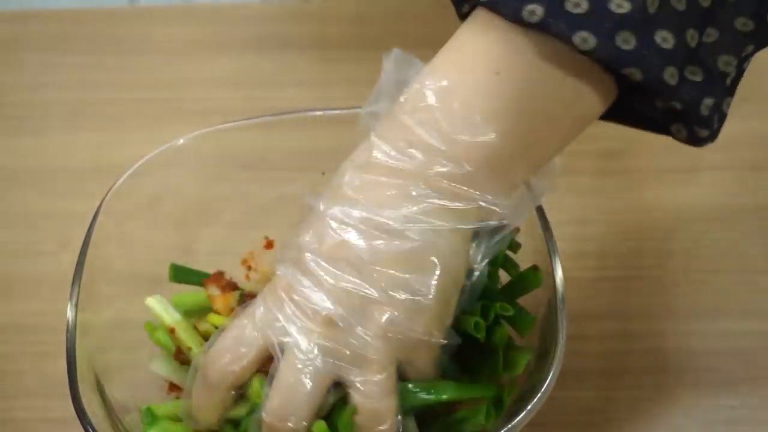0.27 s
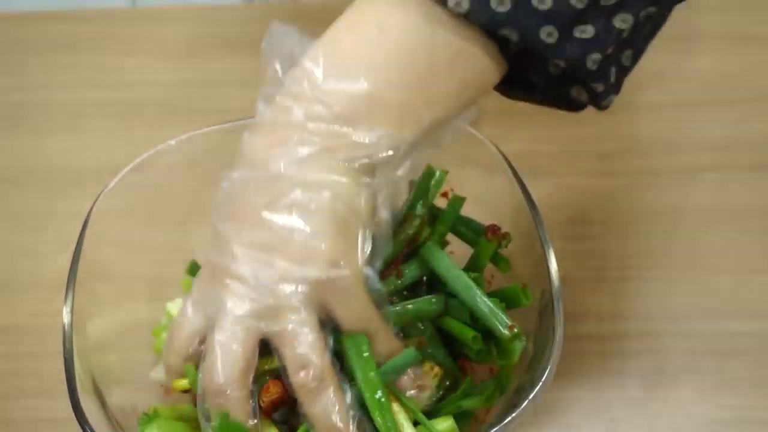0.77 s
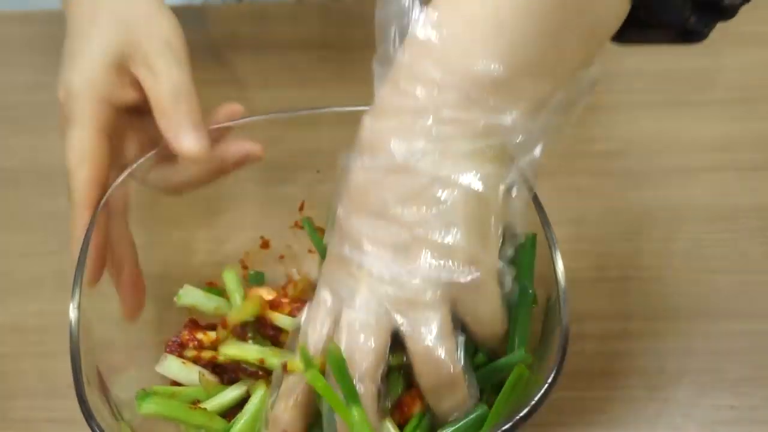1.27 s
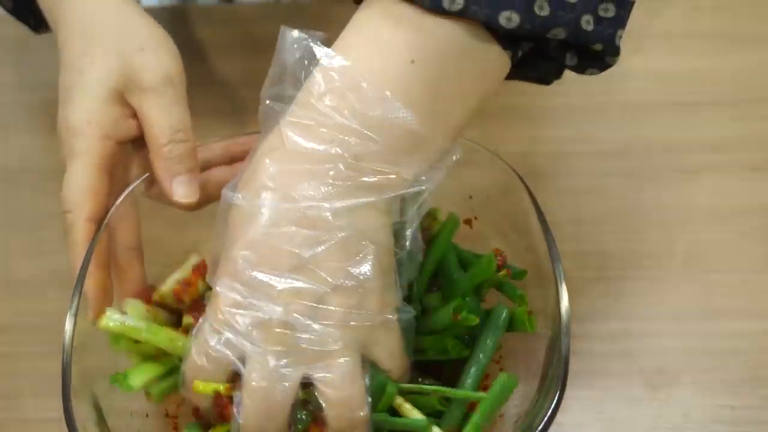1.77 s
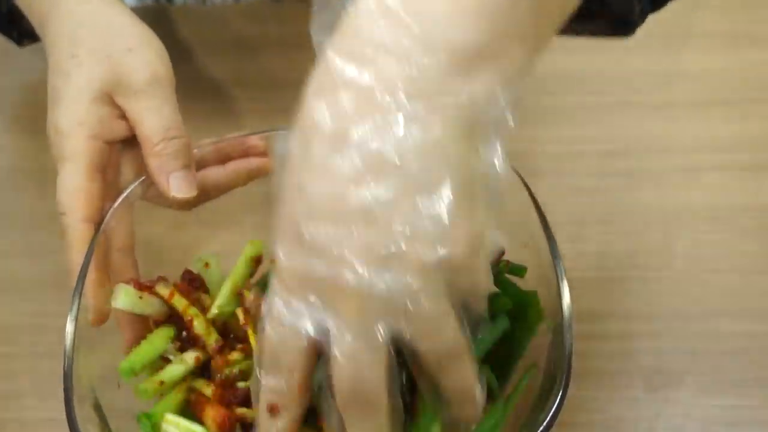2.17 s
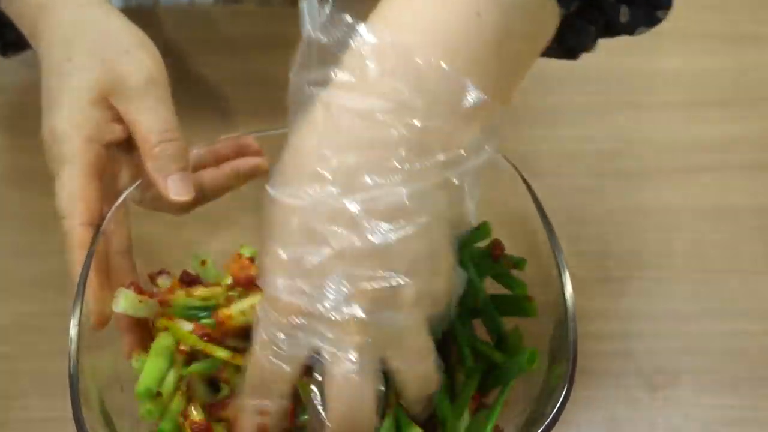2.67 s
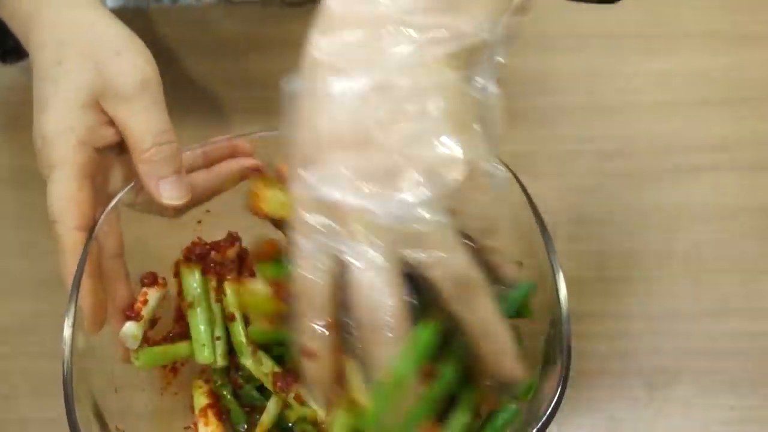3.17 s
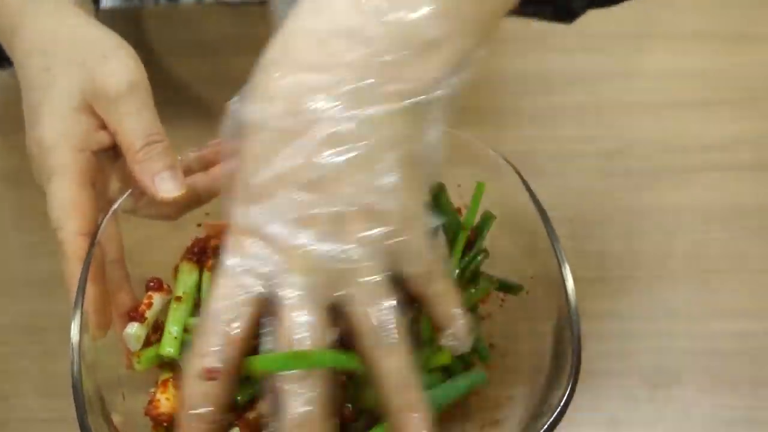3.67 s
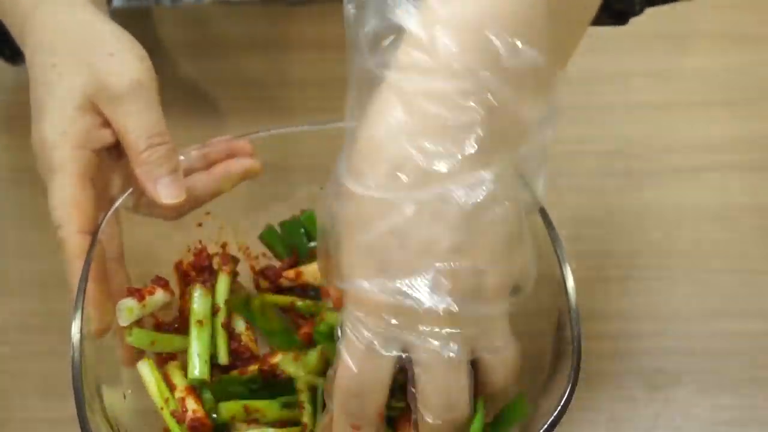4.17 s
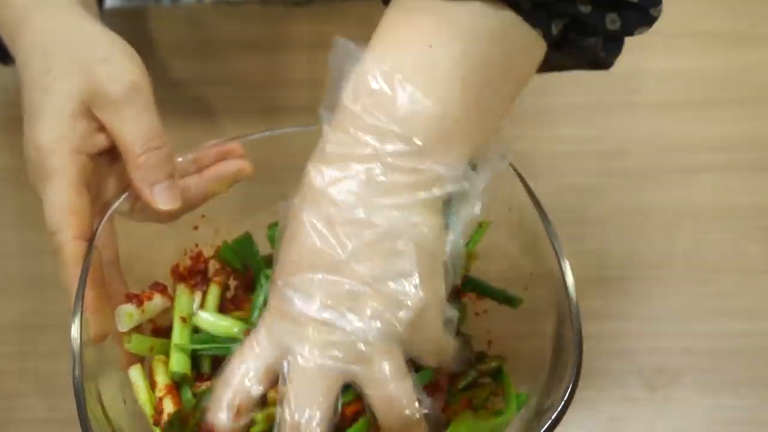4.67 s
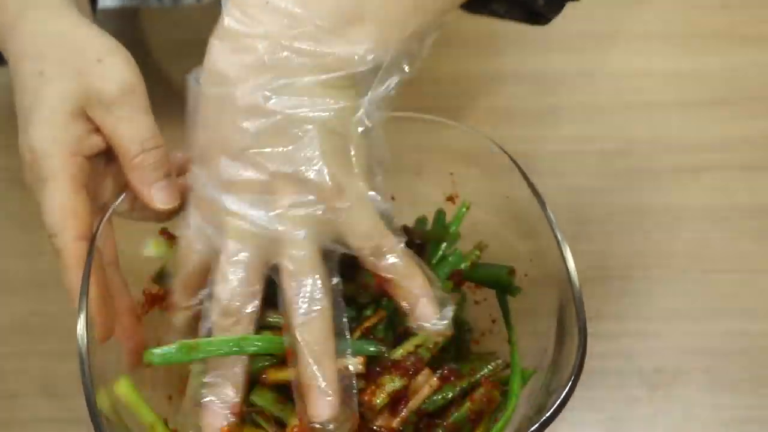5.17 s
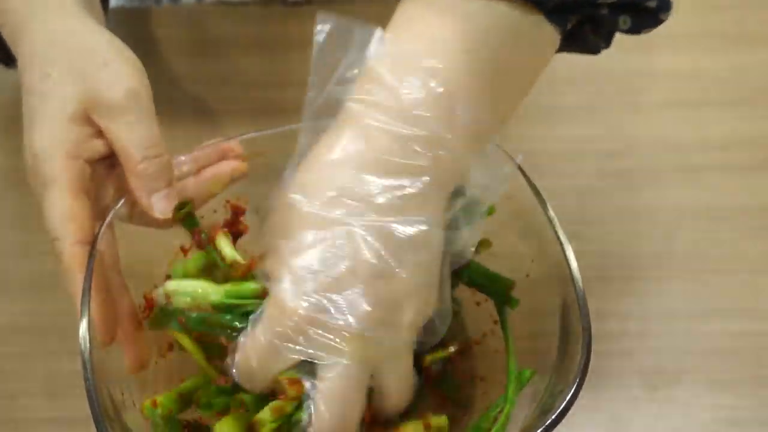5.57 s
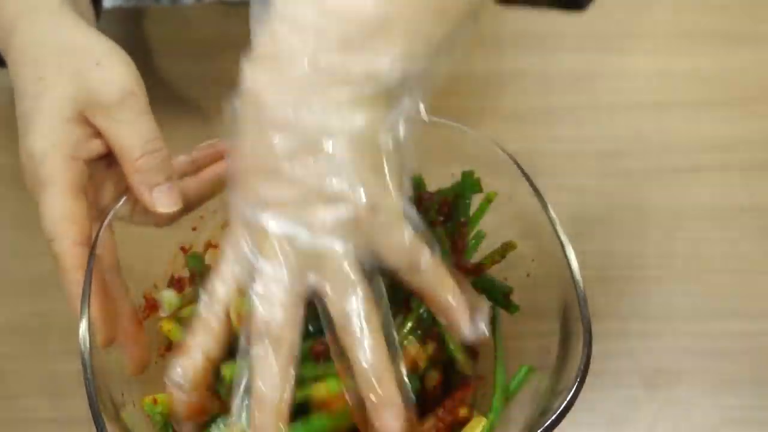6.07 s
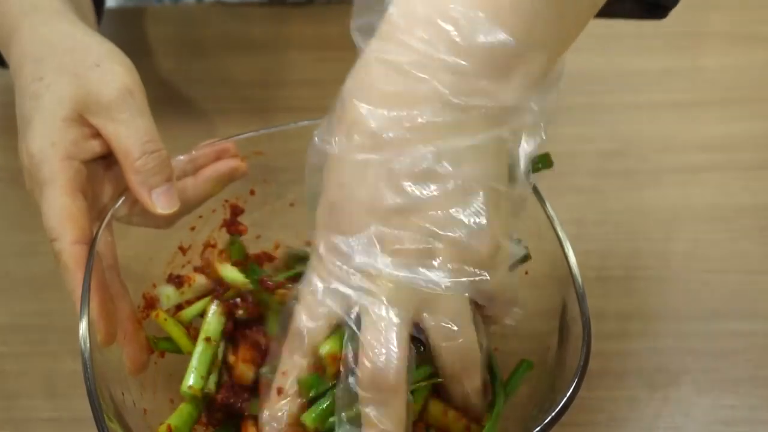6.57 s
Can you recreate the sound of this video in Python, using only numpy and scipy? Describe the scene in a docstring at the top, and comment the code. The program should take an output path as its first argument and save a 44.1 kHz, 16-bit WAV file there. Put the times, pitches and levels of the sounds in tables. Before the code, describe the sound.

Close, crisp plastic-film rustling in quick squeezes, moist stalks tumbling and crunching, brief wet squeaks, and a glass bowl thudding on wood.

```python
"""A hand in a thin plastic glove tosses cut green stalks in a glass bowl on a wooden table, heard close up.
A quiet kitchen (shaped noise) and mains hum (a sine swelling until 4.7 s) lie under it from the start.
At once the film crackles and the stalks tumble (grains that follow the squeezes of the hand), wet film
scrapes on the glass (stick-slip pulses) and the bowl knocks on the table (ringing modes). Even squeaks join
at 0.9 s, loud film snaps at 1.2 s, stalk crunches at 1.9 s; the hardest knocks come at 4.7 and 5.4 s."""
import sys
import numpy as np
from scipy import signal
from scipy.fft import rfft, irfft, next_fast_len
from scipy.io import wavfile
from scipy.ndimage import map_coordinates

SR = 44100
rng = np.random.default_rng(int(sys.argv[2]) if len(sys.argv) > 2 else 0)


def put_to_file(sound):
    """Save the sound as 16-bit audio at rate SR, in the file named by the first command-line argument."""
    columns = np.atleast_2d(sound).T  # one column per channel
    safe = np.clip(columns, -1, 1)
    whole_steps = np.round(safe * 32767)
    wavfile.write(sys.argv[1], SR, whole_steps.astype(np.int16))


N = 301644


def amp(db):
    """Gain of a level in dB."""
    return 10 ** (np.asarray(db) / 20)


def unit(x):
    """x at rms 1."""
    return x / np.sqrt(np.mean(x ** 2) + 1e-20)


def along(points, hz):
    """Read (f/Hz, value) points on a log frequency axis."""
    f, v = np.transpose(points)
    return np.interp(np.log(hz + 1), np.log(f + 1), v)


def curves(rows):
    """One value per sample for each column after the time."""
    s, *cols = np.transpose(rows)
    return [np.interp(np.arange(N) / SR, s, c) for c in cols]


def wobble(rate):
    """A smooth random curve, rate knots a second."""
    knots = rng.standard_normal(int(N * rate / SR) + 4)
    return map_coordinates(knots, [np.arange(N) * rate / SR])


def filtered(x, response):
    """x times a complex response of frequency."""
    m = next_fast_len(N + SR // 2)
    spectrum = rfft(x, m) * response(np.fft.rfftfreq(m, 1 / SR))
    return irfft(spectrum, m)[..., :N]


def modes(table):
    """Causal response of (f/Hz, width/Hz, level/dB) resonances, summed with alternating polarity."""
    def response(f):
        total = 0
        for k, (centre, width, db) in enumerate(table):
            damping = 1j * f * width
            total = total + (-1) ** k * amp(db) * damping / (centre * centre - f * f + damping)
        return total
    return response


def grains(s, gain, hz, cycles, spread, size):
    """Damped sines; each reaches one microphone port a few microseconds before the other."""
    start = np.floor(s * SR).astype(int)
    lag = spread * rng.standard_normal(len(s))
    index = (start[:, None] + np.arange(size)).ravel()
    out = []
    for side in (-.5, .5):
        onset = s - start / SR + side * lag + 1 / SR
        t = np.maximum(np.arange(size) / SR - onset[:, None], 0)
        turns = hz[:, None] * t
        decay = np.exp(-turns / np.reshape(cycles, (-1, 1)))
        wave = gain[:, None] * np.sin(2 * np.pi * turns) * decay
        out.append(np.bincount(index, wave.ravel(), N + size)[:N])
    return np.array(out)


def swarm(level_db, count, hz, octaves, cycles, spiky_db, clump_db, clump_rate, size):
    """Random grains in clumps: harder work packs them denser as well as louder."""
    dense = amp(.5 * level_db + clump_db * wobble(clump_rate))
    place, tone, big = rng.random((3, count))
    clock = np.arange(N - 1, step=(N - 1) / N) / SR
    s = np.interp(place, np.cumsum(dense) / dense.sum(), clock)
    pitch = np.clip(hz * 2 ** (octaves * (2 * tone - 1)), 100, SR / 2.5)
    spike_db = -spiky_db * np.log(big + 1 / 1000)  # a few grains stand far out
    gain = amp(spike_db + 0.75 * np.interp(s * SR, np.arange(N), level_db))
    polarity = rng.choice([-1, 1], count)
    return grains(s, gain * polarity, pitch, cycles, spread=1.1e-5, size=size)


def scaled(x, level_db):
    """x at the mean power of a level curve."""
    return unit(x) * np.sqrt(np.mean(amp(level_db) ** 2))


# mains hum swelling and sinking: t/s, level/dB (rms, before its wobble)
HUM_SWELL = [(0.0, -54.5), (4.74, -45.5), (6.84, -54)]
# colour of the room noise: f/Hz, relative density level/dB
KITCHEN_COLOUR = [(20, -21), (40, -3), (70, -8.5), (285, -11), (714, -7.5), (1480, -12.5), (7310, -15),
                  (12500, -30), (16000, -20)]
# how alike the room noise is left and right: f/Hz, likeness (0-1)
ROOM_LIKENESS = [(30, 1), (200, 0.21), (1000, 1), (10000, 0.86)]


def kitchen():
    """Steady room noise and a slightly unsteady mains hum."""
    def mid_and_side(f):
        turn = np.arccos(np.clip(along(ROOM_LIKENESS, f), -1, 1)) / 2
        return amp(along(KITCHEN_COLOUR, f)) * [np.cos(turn), np.sin(turn)]

    mid, side = filtered(rng.standard_normal((2, N)), mid_and_side)
    room = amp(-46.5) * unit(np.array([mid + side, mid - side]))
    t = np.arange(N) / SR
    hum_level = np.sqrt(2) * amp(curves(HUM_SWELL)[0] + 0.44 * wobble(6.0))
    port_phase = np.array([[.25], [-.25]])
    hum = hum_level * np.sin(2 * np.pi * 59.9 * t + 0.65 * wobble(12) - port_phase)
    return room + hum * amp([[.4], [-.4]])


# squeezes of the hand: closed at t/s, swell before it t/s, hold t/s, film crackle level/dB,
# growth over the hold level/dB, stalks relative to the film level/dB
HAND_SQUEEZES = [(.02, .05, .06, -40, -1, -3), (.115, .02, .16, -32, 6, -4.5),
                 (.33, 0.0201, .13, -36, -5, -2), (.478, .01, .085, -30, -4, -4),
                 (.76, .07, .21, -28, -3, -6), (1.03, 0.0199, .1, -39, -1, -3), (1.3, .2, .03, -28, -2, -5),
                 (1.385, .05, .045, -22.5, -2, -5.5), (1.47, .05, .13, -33, 1, 0),
                 (1.75, .3, .17, -27, 1, -4.5), (2.06, .3, .2, -30, -7, -4), (2.4, .05, .09, -31, 9, -5),
                 (2.5, 0.0502, .09, -20, -4, -4), (2.6, 0.0302, .14, -23, -10, -2),
                 (2.86, .3, .06, -30, -1, -3), (2.96, .06, .05, -25, -2, -2.5),
                 (3.05, 0.052, .11, -34, 3, -3), (3.27, .06, .06, -27, -2, -5),
                 (3.37, .07, .15, -22, -11, -6), (3.56, .08, .07, -29, -2, -5), (3.66, .03, .1, -36, 0, -7),
                 (3.85, .11, .36, -24, -8, -5), (4.25, .09, .02, -25, 0, -3.5),
                 (4.39, .1, .16, -30, -8, -4), (4.63, .08, .06, -23, 4, -3.5),
                 (4.69, 0.034, .17, -19, -6, -2.5), (4.97, .15, .23, -30, 2, -4.5),
                 (5.3, .1, 0.0705, -27, 1, -5), (5.41, .12, .09, -19, -6, -4),
                 (5.54, 0.04985, .07, -30, -5, -1), (5.83, .3, .18, -31, -13, -6),
                 (6.2, .2, .02, -30, 0, -4), (6.24, .08, .13, -26, -3, -5), (6.4, .03, .29, -32, -1, -5),
                 (6.73, .07, .11, -26.5, -6, -4)]
REST_DB, STALKS_REST_DB = -46, -51  # the moving hand rustles faintly between squeezes
SWELL_DB, LET_GO_DB_PER_S = 15, 250  # rise over one swell length; fall as the fingers open


def hand():
    """Levels of film and stalks in dB: every squeeze swells, grows or sags while held, and lets go."""
    t = np.arange(N) / SR
    film, stalk = np.full(N, amp(REST_DB)), np.full(N, amp(STALKS_REST_DB))
    for s, swell, hold, db, growth_db, stalk_db in HAND_SQUEEZES:
        closing_db = SWELL_DB * np.maximum(s - t, 0) / swell
        opening_db = LET_GO_DB_PER_S * np.maximum(t - s - hold, 0)
        held_db = db + growth_db * np.clip((t - s) / hold, 0, 1)
        work = amp(held_db - (closing_db + opening_db))
        film = np.maximum(film, work)
        stalk = np.maximum(stalk, amp(stalk_db) * work)
    return 20 * np.log10(film), 20 * np.log10(stalk)


# single loud creases of the film: t/s, relative level/dB, f/Hz of the main buckling
FILM_SNAPS = [(1.1532, -2, 7150), (1.1902, 2.5, 7460), (1.28, 2, 7670), (1.2965, 1, 5100),
              (1.3091, 4.5, 6920), (1.573, 1.5, 7360), (1.6777, 0, 3120), (1.8114, -7, 3600),
              (1.9075, 3, 2750), (1.9189, -0.5, 2550), (2.2847, -2, 6000), (2.3153, 1, 5640),
              (2.3262, -3, 4430), (2.3653, 2, 6800), (2.413, 1, 7200), (2.829, 6, 8350), (2.8916, 5, 6030),
              (2.9672, 4.5, 4460), (3.0034, 6.5, 4900), (3.1343, -0.5, 8350), (3.2573, 2, 6610),
              (3.274, 0.5, 5170), (3.3497, 9, 8800), (3.4474, 4, 8670), (3.4993, 5, 10700),
              (3.7264, -4, 6440), (3.7674, -0.5, 5530), (3.8, 8, 6650), (4.0344, 5.5, 8850),
              (4.3745, -10, 4790), (4.5186, -4, 6900), (4.6184, -9, 5630), (4.766, -7, 8040),
              (5.227, -0.5, 6500), (5.2904, 0, 3270), (5.3767, 9.5, 7280), (5.4982, 0, 5720),
              (5.671, -19, 8430), (6.2257, -0.5, 4930), (6.277, 0, 2678), (6.609, -3, 8060)]
# colour of the film crackle: f/Hz, relative level/dB
FILM_COLOUR = [(1200, -8.5), (2500, -8), (4000, -3.5), (7000, 1.5), (10000, -1), (13000, -7), (16000, -1)]


def glove(level_db):
    """Creases of the film buckle: a dense crackle with loud snaps, each a quick run of a few bucklings."""
    crackle = swarm(level_db, count=30000, hz=6000, octaves=1.3, cycles=1.5,
                    spiky_db=3.3, clump_db=4, clump_rate=120, size=48)
    crackle = filtered(crackle, lambda f: amp(along(FILM_COLOUR, f)))
    s, db, hz = np.repeat(FILM_SNAPS, 4, axis=0).T
    beside_main = np.arange(len(s)) % 4 > 0  # three weaker bucklings around each main one
    late, tone = rng.uniform([[-.5], [0]], 1, (2, len(s))) * beside_main
    gain = amp(db - 5.5 - 15.7 * np.sqrt(np.abs(late)))
    pitch = hz * 2 ** (1.03 * tone - 0.27 * (tone > 0))
    snaps = grains(s + .003 * late, gain, pitch, cycles=1.15, spread=1.2e-5, size=128)
    snaps = filtered(snaps, lambda f: f * f / (f * f + 1500 ** 2))  # thin out the lows
    return scaled(crackle, level_db + 0.5) + snaps


# stalks that break or strike the glass: t/s, level/dB before the bass cut, f/Hz
STALK_CRUNCHES = [(1.9075, -2, 1960), (1.918, -7, 1800), (1.969, -13, 960), (2.411, -14, 1240),
                  (2.592, -1.5, 1300), (2.967, -21, 1210), (4.25, -16, 1300), (4.349, -14, 1280),
                  (4.625, -12, 1280), (4.669, -16, 900), (4.723, -3, 1900), (4.823, -4, 1250),
                  (5.375, 6, 850), (5.5376, 1.5, 2070), (5.615, -23, 1200), (5.647, -17, 1160),
                  (5.664, -17, 1190), (5.68, -28.5, 1170), (5.731, -14.5, 1240), (6.2285, 1, 1660)]
# resonances of the air in the bowl: f/Hz, width f/Hz, relative level/dB
BOWL_AIR = [(726, 102, -0.5), (1175, 280, 1), (2050, 1300, -3.5), (433, 270, -13)]
RING_CYCLES, SOFTER_RINGS = .9, .45  # decay of a 0 dB crunch; softer ones ring longer (dB per dB)


def stalks(level_db):
    """Stalks crunch and tumble; the air in the bowl colours the tumbling."""
    tumble = swarm(level_db, count=9000, hz=1460, octaves=0.91, cycles=1.7,
                   spiky_db=2.5, clump_db=4, clump_rate=40, size=160)
    tumble = scaled(filtered(tumble, modes(BOWL_AIR)), level_db - 0.5)
    s, db, hz = np.transpose(STALK_CRUNCHES)
    cycles = RING_CYCLES * amp(-SOFTER_RINGS * db)
    cracks = grains(s, -amp(db), hz, cycles, spread=1.2e-5, size=500)
    # small pieces radiate no bass
    return tumble + filtered(cracks, lambda f: (1j * f / (700 + 1j * f)) ** 2)


# wet film rubbing the glass: start t/s, length t/s, loudest at (share of length), level/dB at the loudest,
# first and last slip rate f/Hz (before unevenness), centre and width of the rubbed patch f/Hz, unevenness (0-1)
FILM_RUBS = [(.103, .12, .35, -21, 1800, 1800, 1000, 1600, .9),
             (.165, .065, .3, -26, 1500, 1500, 3900, 900, .9),
             (.4745, .055, .02, -18, 3500, 3500, 1900, 5000, .9),
             (2.57, .07, .43, -24, 3000, 3000, 2400, 3500, .9),
             (.903, .07, .8, -18.5, 190, 400, 1600, 900, .13),
             (.97, .03, .35, -22, 220, 170, 1600, 900, .13),
             (1.8, .1, .6, -26.5, 1090, 720, 1400, 2400, .03),
             (1.908, .03, .4, -28, 1200, 950, 1250, 2400, .03),
             (5.531, .018, .6, -20, 5100, 4600, 4800, 2000, .03),
             (5.543, .047, .7, -19.5, 880, 1270, 2800, 5500, .028)]
EDGE_DB, ROUND, EASE = 12, 2.5, 1.8  # ends under the peak; roundness of an even swell; easing of the glide
FULL_SCRAPE_LEAD_S = 2e-5  # scrapes sit towards the left port; lead at unevenness 1


def squeaks():
    """Wet film sticks and slips: pulses through the rubbed patch; even ones squeak, uneven ones scrape."""
    out, t = np.zeros((2, N)), np.arange(N) / SR
    for s, length, top, db, first_hz, last_hz, hz, width_hz, uneven in FILM_RUBS:
        u = np.clip((t - s) / length, 0, 1)
        on = (u > 0) & (u < 1)
        rate = last_hz + (first_hz - last_hz) * (1 - u) ** EASE
        from_top = np.where(u < top, 1 - u / top, (u - top) / (1 - top))
        level_db = db - EDGE_DB * from_top ** (ROUND ** (1 - uneven))
        turns = np.cumsum(on * rate * np.exp(uneven * wobble(rate.max() / 3))) / SR
        # a slip is short enough to reach the top of the patch's band
        narrow = ((hz + width_hz / 2) / rate) ** 2
        sizes = amp(level_db + np.minimum(60 * uneven, 2.5) * wobble(rate.max() / 3))
        roughness = 1 + 0.58 * rng.standard_normal(N)  # noise roughens every slip
        slips = on * np.exp(narrow * (np.cos(2 * np.pi * turns) - 1)) * sizes * roughness
        lead = FULL_SCRAPE_LEAD_S * uneven

        def patch(f):
            port_lead = np.exp(1j * np.pi * f * lead * np.array([[1], [-1]]))
            return modes([(hz, width_hz, 0)])(f) ** 2 * port_lead

        sound = filtered(slips, patch)
        out += sound * np.sqrt(np.mean(amp(level_db[on]) ** 2) / np.mean(sound[:, on] ** 2))
    return out


# the bowl knocking on the table: t/s, drive of glass, table top and table frame as relative level/dB
BOWL_KNOCKS = [(.13, -28, -38, -50), (0.768, -39, -34, -48), (1.373, -20.5, -38.5, -23.5),
               (2.498, -34, -48, -47), (2.949, -31, -38, -43), (3.195, -31, -48, -42),
               (3.801, -31.5, -36.5, -42), (4.131, -31, -50, -47), (4.687, -10, -31, -21),
               (5.23, -31.5, -43.5, -45), (5.374, -8, -31.5, -19.5), (6.207, -27.5, -43, -36)]
# modes of the glass, the table top and the table frame: f/Hz, relative level/dB, t60 t/s
GLASS_MODES = [(357, 5, 0.075), (438, 1.5, 0.069), (281, -7, 0.076), (530, -6, 0.067), (726, -5.5, 0.12),
               (190, -6.5, 0.048)]
TOP_MODES = [(136.8, 3.5, 0.35), (166.8, 3.5, 0.17)]
FRAME_MODES = [(80.7, -1.5, 0.22), (41.4, -15, 0.51)]


def bowl():
    """Each knock rings the loaded glass and thuds the table; the table shakes the two ports unequally."""
    out, t = np.zeros((2, N + SR)), np.arange(SR // 2) / SR

    def ring(table, shape):
        total = 0
        for hz, db, t60 in table:
            decay = amp(db + rng.normal(0, 2.1, shape) - 60 * t / t60)
            total = total + decay * np.sin(2 * np.pi * hz * t)
        return total

    for s, glass_db, top_db, frame_db in BOWL_KNOCKS:
        glass = amp(glass_db - 6) * (1 - np.exp(-t / .0005)) * ring(GLASS_MODES, 1)
        wood = amp(top_db) * ring(TOP_MODES, (2, 1)) + amp(frame_db) * ring(FRAME_MODES, (2, 1))
        thud = (1 - np.exp(-t / 0.021)) * wood  # the table answers more slowly than the glass
        out[:, round(s * SR):][:, :len(t)] += glass + thud
    return out[:, :N]


# decay of the room: f/Hz, t60 t/s
WALL_DECAY = [(200, 0.39), (2000, 0.3), (10000, 0.29)]


def walls(x):
    """A short tail, nearly alike at both ports; each frequency dies at its own speed."""
    hz, t, z = signal.stft(rng.standard_normal((2, SR // 3)), SR, nperseg=256)
    decay = amp(-60 * t / along(WALL_DECAY, hz)[:, None])
    mid, side = signal.istft(z * decay, SR, nperseg=256)[1] * amp([[0], [-27]])
    tail = np.array([mid + side, mid - side]) / np.linalg.norm(mid)
    return signal.fftconvolve(x[None], tail, axes=1)[:, :N]


def scene():
    """The bowl's sounds with the room's answer over the kitchen."""
    film_db, stalk_db = hand()
    near = glove(film_db) + stalks(stalk_db) + squeaks() + bowl()
    return near + amp(-9) * walls(near.mean(axis=0)) + kitchen()


TOP_HZ = 15750  # band limit


def record(dry):
    """The input stage rounds off the highest peaks; nothing is kept above the band limit."""
    rounded = dry / (1 + np.abs(dry / .98) ** 8) ** (1 / 8)
    return filtered(rounded, lambda hz: hz < TOP_HZ)


dry = scene()
out = record(dry)
put_to_file(out)
```